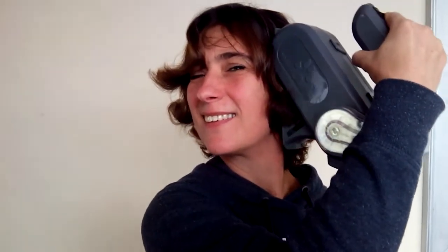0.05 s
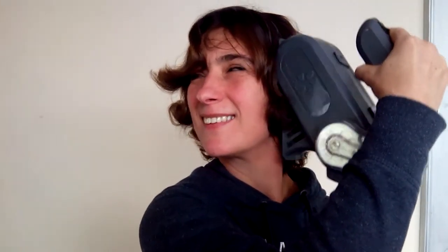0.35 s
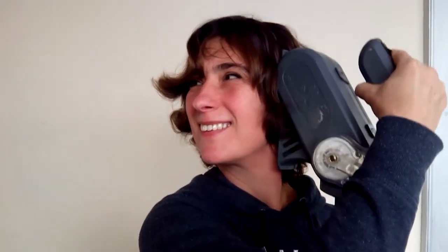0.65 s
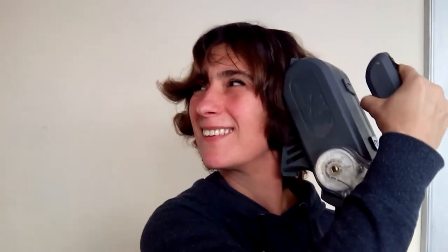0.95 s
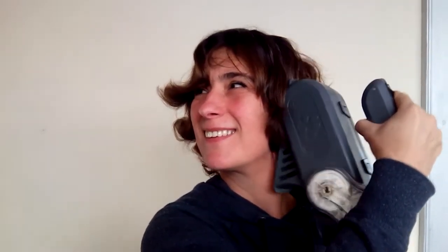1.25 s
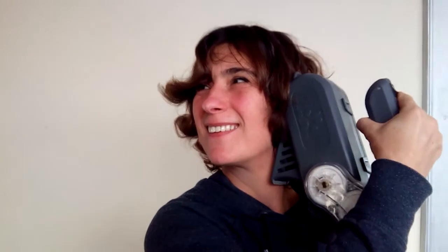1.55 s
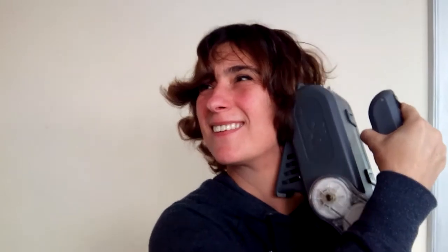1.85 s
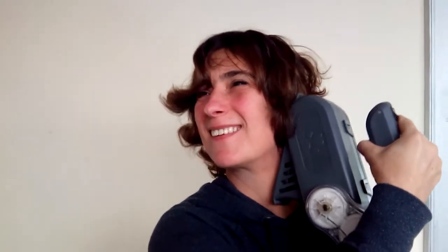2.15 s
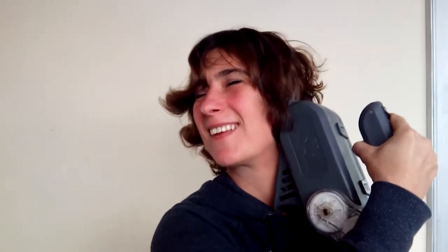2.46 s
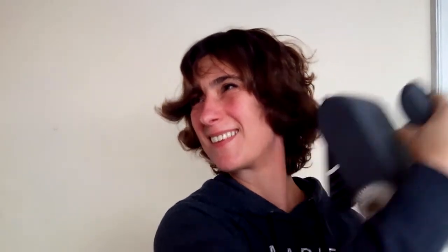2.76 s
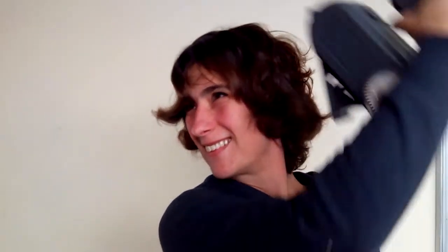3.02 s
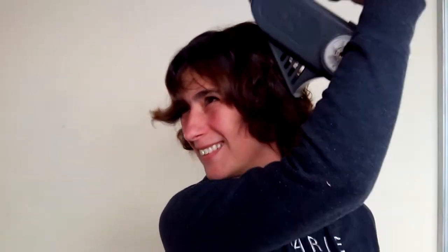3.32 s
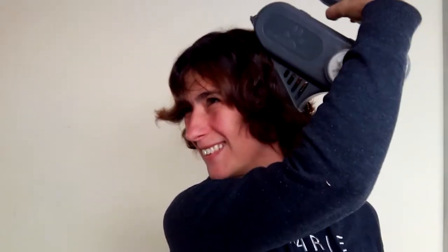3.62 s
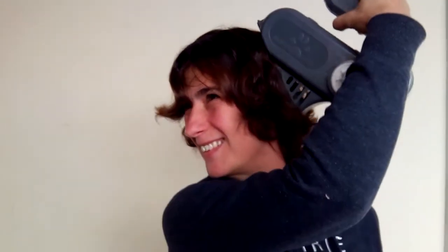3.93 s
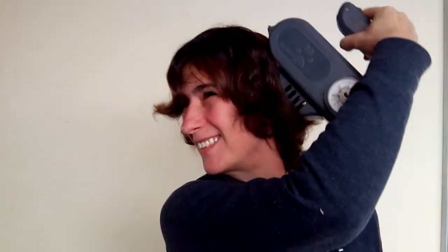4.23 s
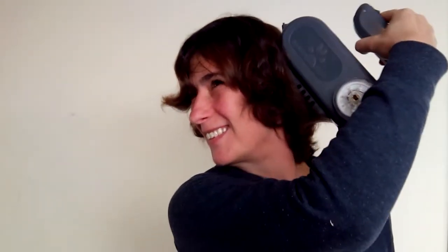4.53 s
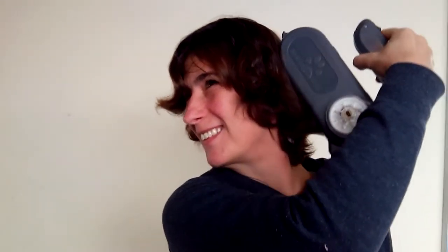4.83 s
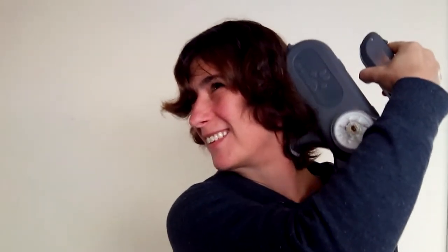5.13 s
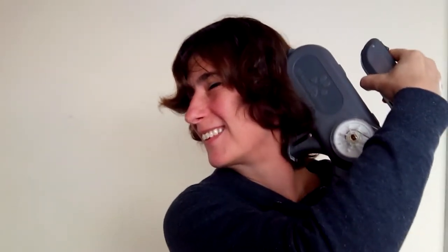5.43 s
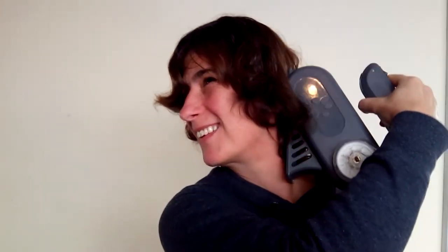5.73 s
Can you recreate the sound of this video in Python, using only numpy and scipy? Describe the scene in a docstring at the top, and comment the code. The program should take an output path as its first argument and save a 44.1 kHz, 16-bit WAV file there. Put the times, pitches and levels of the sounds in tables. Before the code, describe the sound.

Steady whine and rattling whir of an electric hair brush in a small room, with soft bumps and light crackling of hair.

```python
"""In a small room, a handheld motorised brush is pressed to hair, lifted, tipped over and pressed on again.
Its motor hums at about 90 turns a second. A 12-tooth gear (the pinion) whines and rattles against
a 30-tooth wheel in a plastic housing. The speed sags under load and sways with each turn of the roller.
Hair crackles in the comb, the roller rushes, the hand rumbles, and a few dull bumps pass through."""
import sys
import numpy as np
from scipy import signal
from scipy.fft import rfft, irfft, next_fast_len
from scipy.io import wavfile

SR = 44100
rng = np.random.default_rng(int(sys.argv[2]) if len(sys.argv) > 2 else 0)


def file_out(sig):
    """Save sig as 16-bit WAV at sys.argv[1]."""
    # one column per channel
    cols = np.atleast_2d(sig).T
    # limit, then scale
    lim = np.clip(cols, -1, 1)
    pcm = np.round(lim * 32767).astype(np.int16)
    wavfile.write(sys.argv[1], SR, pcm)


N = 259308
TIME = np.arange(N) / SR
PINION_TEETH, WHEEL_TEETH = 12, 30
TANGLE_S, TANGLE_HALF_S = 1.595, 0.036   # a tangle brakes the motor once

# Motor speed under the drag of the hair: time_s, turns_per_s
MOTOR_SPEED = [(0.0, 89.38), (0.16, 89.7), (0.32, 89.52), (0.52, 91.04), (0.68, 89.46), (0.8, 89.26),
               (0.88, 90.29), (1.08, 90.07), (1.28, 90.71), (1.4, 90.0), (1.56, 89.69), (1.88, 90.64),
               (2.16, 90.22), (2.36, 91.07), (2.48, 90.68), (2.64, 91.2), (2.88, 91.26), (3.12, 90.58),
               (3.2, 91.35), (3.72, 90.79), (3.88, 91.13), (4.08, 88.59), (4.28, 89.12), (4.32, 89.7),
               (4.4, 88.7), (4.52, 88.0), (4.64, 88.84), (4.84, 87.51), (4.88, 88.65), (5.0, 88.94),
               (5.08, 87.97), (5.12, 88.29), (5.2, 87.73), (5.28, 88.32), (5.36, 87.98), (5.44, 88.76),
               (5.48, 88.09), (5.6, 87.78), (5.8, 89.55), (5.88, 89.76)]
# How much the ears differ (side) against what they share (mid): pitch_hz, side_minus_mid_db
STEREO_WIDTH = [(60, -14.5), (200, -28), (500, -16), (1400, -13), (2500, -7.5), (3600, -6.5), (4500, -1.5),
                (5300, 0), (7500, 9.5)]
# Which ear hears more: pitch_hz, left_minus_right_db
STEREO_BALANCE = [(60, 0), (450, 1.5), (2200, 1.5), (4300, 1.2), (5000, -2), (7500, -3)]


def motor_speed(sway_turns_per_s=0.38, turns_per_roll=30, tangle_turns_per_s=1.0):
    """Turns per second: the roller drags unevenly as it goes round, and the tangle brakes it."""
    speed, = in_time(MOTOR_SPEED)
    roller_turns = np.cumsum(speed) / SR / turns_per_roll
    sway = sway_turns_per_s * np.cos(2 * np.pi * (roller_turns - 0.187))
    return speed + sway - tangle_turns_per_s * swell(TANGLE_S, TANGLE_HALF_S)


def hum_and_whine(turns, speed, wheel_angle, throb_depth):
    """The motor hums and the gear teeth whine; the whine throbs with each turn of the wheel."""
    # How the housing faces the room: time_s, tilt (0 upright, 1 tipped over)
    tilt_curve = [(0, 0.094), (3.1, 0.15), (3.85, 0.37), (4.15, 0.99), (5.88, 0.94)]
    # Two low hum tones, at 4 and 5 cycles per turn: time_s, lower_tone_db, upper_tone_db
    hum_levels = [(0.0, -34.5, -39.5), (0.47, -43.5, -42), (0.91, -38, -38.5), (0.95, -45, -41.5),
                  (1.65, -44, -39.5), (2.67, -48, -37), (2.72, -45.5, -45), (3.21, -53, -45),
                  (3.37, -52.5, -61), (3.52, -58, -44.5), (4.1, -48.5, -43.5), (4.26, -43, -41.5),
                  (4.47, -53, -46), (4.68, -38.5, -41.5), (4.77, -46.5, -48), (5.01, -41.5, -36),
                  (5.14, -50, -48), (5.27, -38.5, -45), (5.75, -37.5, -42.5), (5.88, -50, -41)]
    # Main tones of motor and gears: cycles_per_turn
    main_cycles = (1, 8, 24, 34, 36, 42, 46, 48, 50, 54, 58)
    # One row per main tone: upright_db, tipped_db, db_per_extra_turn_per_s,
    # throb_share, throb_lead_rad, bend_rad, bend_lead_rad
    main_tones = [(-60, -66, 0, 0, 0, 0, 0), (-50.7, -54.5, 1, 0, 0, 0, 0),
                  (-43.5, -59, 2, 1.5, 2.8, .5, 1.7), (-46.3, -52.5, 2.5, 2.4, -.3, .7, -1.6),
                  (-39.8, -42.5, -1, 1.5, 0, .5, -.9), (-44.3, -45.5, -1, 1.1, .5, 1.3, -1.8),
                  (-45.5, -41.5, 2.5, 2.1, -.2, .8, -2.8), (-39.2, -46, -1.6, 1.9, -.1, 1.1, 0),
                  (-40.7, -44.8, -1, 1.4, 0, .6, 1.9), (-40, -42, -2.2, .9, .6, 1, -2.1),
                  (-44.3, -45.5, 0, 1.3, -.3, 1.5, 3)]
    # Lesser tones of motor and gears: cycles_per_turn, upright_db, tipped_db
    lesser_tones = [(3.8, -58.0, -59.0), (5.2, -51.0, -52.0), (5.4, -58.5, -57.5), (6.0, -56.5, -57.5),
                    (7.0, -57.0, -56.5), (10.0, -57.0, -61.0), (11.0, -61.5, -60.5), (11.6, -65.0, -53.5),
                    (12.0, -52.5, -50.5), (12.4, -61.5, -56.0), (13.0, -59.0, -62.5), (14.0, -58.0, -51.0),
                    (14.4, -70.0, -60.0), (15.0, -50.0, -58.5), (16.0, -59.5, -58.5), (18.0, -65.5, -64.5),
                    (18.4, -64.5, -66.5), (20.0, -60.5, -59.5), (22.0, -55.0, -56.5), (24.8, -57.5, -60.5),
                    (25.0, -55.0, -56.0), (26.0, -57.5, -60.5), (26.4, -56.0, -60.5), (28.0, -51.0, -52.5),
                    (28.8, -59.0, -62.5), (30.0, -56.5, -61.0), (31.6, -59.5, -64.0), (32.0, -57.0, -59.0),
                    (32.8, -62.0, -59.0), (37.0, -58.5, -55.5), (37.6, -58.5, -57.5), (38.0, -49.5, -49.5),
                    (39.2, -52.0, -61.0), (39.6, -53.0, -62.5), (40.0, -51.0, -58.0), (40.8, -56.5, -59.5),
                    (42.8, -56.5, -60.5), (44.0, -57.0, -57.5), (44.4, -57.0, -58.0), (51.0, -51.0, -54.5),
                    (51.6, -50.0, -54.5), (52.4, -56.0, -54.0), (52.8, -55.5, -53.0), (54.8, -49.0, -52.5),
                    (55.2, -50.0, -50.5), (56.4, -58.0, -57.0), (59.6, -59.5, -53.0), (60.0, -60.0, -55.0),
                    (60.4, -59.0, -53.0), (62.0, -60.5, -59.5), (64.0, -62.5, -62.0), (66.0, -56.0, -57.0)]
    # One tone rings out or fades for a moment: time_s, cycles_per_turn, change_db, half_length_s
    tone_swells = [(.05, 48, -4, .08), (.2, 36, -2.5, .1), (.26, 54, -5, .04), (.48, 36, 1.5, .07),
                   (1.07, 36, -3, .07), (1.35, 58, 4, .06), (.35, 50, -2.5, .35), (.25, 48, -2, .06),
                   (1.72, 46, 5, .06), (3.98, 46, 4, .06), (.53, 8, 5, .07), (.5, 54, -3, .06),
                   (.8, 54, 6.5, .11), (1.2, 54, 3, .08), (1.25, 48, 3, .2), (1.35, 8, 5, .09),
                   (1.4, 24, 2, .5), (1.4, 50, 3, .06), (1.8, 54, 3.5, .1), (2, 8, 6, .07),
                   (2.25, 50, 3, .25), (2.35, 36, 2.5, .15), (2.35, 8, 4, .05), (2.39, 5, -8, .025),
                   (2.6, 5, 2, .07), (2.6, 34, 3.5, .4), (2.85, 42, 5, .05), (2.9, 8, 8, .05),
                   (3.03, 36, -6, .06), (3.08, 50, -4, .04), (3.08, 15, 4, .07), (3.21, 8, 7, .045),
                   (3.21, 36, 6, .04), (3.41, 36, -4, .06), (3.25, 50, 6, .045), (3.2, 26.4, 4, .2),
                   (3.2, 24, 3, .25), (3.35, 46, 5.5, .15), (1.88, 36, 2, .12), (3.41, 48, 3, .07),
                   (3.45, 6, 9, .27), (3.45, 28, 3, .3), (3.4, 20, 3, .3), (3.98, 12, 7, .04),
                   (5.82, 48, 4, .04), (3.48, 50, 3, .08), (3.65, 54, 5, .06), (3.67, 36, 4, .08),
                   (3.85, 42, 4, .12), (3.98, 36, 5, .04), (4.05, 54, 7, .04), (4.13, 36, -7, .04),
                   (4.21, 54, 8, .05), (4.36, 54, 4, .04), (4.5, 54, 6, .07), (4.85, 36, 5, .05),
                   (5.2, 36, 3.5, .05), (5.43, 8, 9, .04), (5.52, 36, -4, .08), (5.62, 54, -3, .1),
                   (5.65, 46, 3, .2), (5.78, 36, 5, .08), (5.84, 8, 7, .04)]

    whine_from = 2 * PINION_TEETH   # cycles per turn; anything lower is hum
    tilt, = np.float32(in_time(tilt_curve))
    extra_speed = speed - blend(91.03, 88.66, tilt)   # above the usual turns per second
    main_waver = blend(0.13, 0.2, tilt)
    flutter_db = gear_flutter(turns)
    wheel_angle = np.float32(wheel_angle % (2 * np.pi))

    tones = []   # cycles_per_turn, level_db, waver, throb, turns
    for cycles, level_db in zip((4, 5), in_time(hum_levels)):
        tones.append((cycles, level_db - 1 + flutter_db, 0.29, 1, turns))
    for cycles, row in zip(main_cycles, main_tones):
        upright_db, tipped_db, db_per_speed, throb_share, throb_lead, bend, bend_lead = row
        level_db = blend(upright_db, tipped_db, tilt) + db_per_speed * extra_speed - 0.31
        throb = 1 + throb_share * throb_depth * np.cos(wheel_angle + throb_lead)
        # the wheel also pushes the wave early and late, bending its pitch
        bend_turns = bend * throb_depth * np.sin(wheel_angle + bend_lead) / (2 * np.pi * cycles)
        tones.append((cycles, level_db, main_waver, throb, turns + bend_turns))
    lesser_throb = np.float32(1 + 0.15 * throb_depth * np.cos(wheel_angle))
    for cycles, upright_db, tipped_db in lesser_tones:
        level_db = blend(upright_db, tipped_db, tilt) - (0 if cycles < whine_from else 1.5)
        tones.append((cycles, level_db, 0.55, lesser_throb, turns))

    hum, whine = np.zeros((2, 2, N), np.float32)
    for cycles, level_db, waver, throb, tone_turns in tones:
        ring_db = sum(db * swell(s, half_s) for s, which, db, half_s in tone_swells if which == cycles)
        waver = waver * from_db(-np.maximum(ring_db, 0))   # a tone that rings out holds steadier
        tone = shaft_tone(tone_turns, cycles, level_db + ring_db, waver)
        if cycles < whine_from:
            hum += tone
        else:
            whine += throb * tone
    tangle_dip = from_db(-3 * swell(TANGLE_S, TANGLE_HALF_S))
    return tangle_dip * hum, tangle_dip * whine


def shaft_tone(turns, cycles_per_turn, level_db, waver):
    """One tone in step with the motor shaft; it wavers as its echoes shift with the moving brush."""
    pitch_hz = cycles_per_turn * np.mean(np.array(MOTOR_SPEED)[:, 1])
    cycles = cycles_per_turn * turns + rng.random()
    angle = np.float32(2 * np.pi * (cycles % 1))
    mid = (1 + waver * drift(5.9)) * np.cos(angle) + waver * drift(6) * np.sin(angle)
    mid /= np.sqrt(1 + 2 * waver ** 2)   # wavering adds no power
    width = float(from_db(at_hz(STEREO_WIDTH, pitch_hz)))
    balance = float(from_db(at_hz(STEREO_BALANCE, pitch_hz) / 2))
    side = width * int(rng.choice([-1, 1])) * np.sin(angle + 0.56 * drift(0.79))
    gain = np.float32(np.sqrt(2 / (1 + width ** 2)) * from_db(level_db))
    return gain * np.array([(mid + side) * balance, (mid - side) / balance])


def gear_flutter(turns):
    """The gears bind about once in five turns, so the low hum flutters; gives the change in dB."""
    # Strength of the flutter: time_s, depth (0 to 1)
    flutter_depths = [(0, .15), (.65, .25), (.9, .12), (1.3, .3), (1.8, .3), (2.07, .55), (2.17, .12),
                      (2.55, .2), (4.5, .25), (5.88, .18)]
    depth, = in_time(flutter_depths)
    return 20 * np.log10(1 + depth * np.cos(2 * np.pi * turns / 5 + drift(12)))


def gear_rattle(turns, throb):
    """Each pair of worn teeth meets with its own knock, in a pattern that repeats every five turns."""
    # Loudness of the gear rattle over time, nearly steady: time_s, level_db
    rattle_levels = [(0, -30.5), (.5, -31), (.9, -29.5), (1.3, -30), (2, -30), (2.55, -28), (2.9, -29),
                     (3.35, -30), (3.8, -29), (4.2, -31), (5.88, -30)]
    # Tone colour of the knocks: pitch_hz, level_db
    rattle_colour = [(900, -26.5), (1600, -12.5), (2100, -7), (2700, -5), (3200, 0.5), (3950, -3.5),
                     (4450, 4.5), (5000, -6.5), (5500, -19), (6100, -25.5), (6700, -26), (7500, -26),
                     (8200, -54)]
    # Where the plastic housing rings: pitch_hz, width_hz, boost_db
    housing_rings = [(2360, 34, 5.5), (2400, 67, -11), (3520, 360, -1), (3680, 47, 7), (4360, 33, -0.5),
                     (4750, 380, -0.5), (4780, 330, 6.5), (5180, 80, 14.5), (6370, 30, 19)]
    teeth_passed = turns * PINION_TEETH
    tooth = np.arange(1, int(teeth_passed[-1]))
    force = 0.4 * tooth_wear(PINION_TEETH)[tooth % PINION_TEETH]
    force += 0.55 * tooth_wear(WHEEL_TEETH)[tooth % WHEEL_TEETH]
    force += rng.standard_normal(N)[tooth]   # loose teeth add chance knocks
    # each knock is shared between the two samples around its moment
    position = np.interp(tooth, teeth_passed, np.arange(N))
    sample, part = position.astype(int), position % 1
    knocks = np.bincount(sample, force * (1 - part), N) + np.bincount(sample + 1, force * part, N)
    knocks *= throb
    rattle = to_ears(echoes(knocks), echoes(knocks), rattle_colour, housing_rings)
    rattle_db, = in_time(rattle_levels)
    return from_db(rattle_db - 7.5) * rattle


def tooth_wear(teeth):
    """Random unevenness around a gear, one value for each tooth."""
    ripples = np.exp(2j * np.pi * rng.random(teeth // 2))
    return unit_power(irfft(np.r_[0, ripples], teeth))


def dull_bumps():
    """Soft contacts make low tones that swell and quickly die away."""
    # One row per bump: start_s, peak_db, pitch_hz, rise_s
    bumps = [(0.869, -43, 95.4, 0.027), (1.66, -33, 66, 0.027), (1.774, -21.5, 70, 0.026),
             (1.764, -31.5, 208, 0.006), (1.785, -17, 99.5, 0.0072), (1.793, -20, 139, 0.0089),
             (1.885, -30.5, 90, 0.016), (2.385, -36.5, 83.5, 0.016), (2.488, -35, 148, 0.032)]
    sound = np.zeros(N)
    for start_s, peak_db, pitch_hz, rise_s in bumps:
        age = np.maximum(TIME - start_s, 0)
        shape = (age / rise_s * np.exp(1 - age / rise_s)) ** 2
        sound += from_db(peak_db) * shape * np.sin(2 * np.pi * pitch_hz * age)
    return sound


def hair_crackle(clicks_per_s=4000):
    """Strands snap past the comb in short flurries of tiny clicks."""
    # Hair catching in the comb: time_s, level_db, half_length_s
    snags = [(0.262, -43, 0.0074), (0.313, -42.5, 0.012), (0.643, -50, 0.037), (1.426, -47, 0.037),
             (1.73, -54, 0.04), (2.51, -40.5, 0.04), (2.573, -44.5, 0.0079), (3.248, -47, 0.0099),
             (3.712, -46, 0.06), (4.808, -44, 0.029)]
    # Tone colour of the clicks: pitch_hz, level_db
    crackle_colour = [(1200, -6), (3000, -26), (5500, 3.5), (6600, -8), (7400, -18), (8500, -34)]
    flurries = sum(from_db(db) * swell(s, half_s) for s, db, half_s in snags)
    clicks = (rng.random(N) < clicks_per_s / SR) * rng.standard_normal((2, N))
    return flurries * to_ears(*clicks, crackle_colour)


def roller_rush(rest_db=-43, rub_db=4):
    """A steady rush from the roller, louder for a moment where it rubs over the hair."""
    # Tone colour of the rush: pitch_hz, level_db
    rush_colour = [(120, -42.5), (220, 3), (300, -4.5), (440, 1.5), (600, -2), (850, -1), (1150, -1),
                   (1600, -11), (2500, -2), (4500, -8), (6000, -6), (8000, -44)]
    level_db = rest_db + rub_db * swell(time_s=2.7, half_s=0.015)
    return from_db(level_db) * to_ears(*rng.standard_normal((2, N)), rush_colour)


def hand_rumble(rest_db=-55):
    """A low rumble from the hand, rising whenever the grip shifts."""
    # Shifts of the grip: time_s, rise_db, half_length_s
    grip_shifts = [(.82, 8.5, 0.15), (1.778, 16.5, 0.11), (2.494, 12.5, 0.094), (5.502, 6, 0.63)]
    # Tone colour of the rumble: pitch_hz, level_db
    rumble_colour = [(20, -59.5), (33, -29.5), (45, -7), (62, 5), (88, -6), (125, 2), (160, -3.5), (230, 2),
                     (320, -6.5), (600, -61)]
    level_db = rest_db + sum(db * swell(s, half_s) for s, db, half_s in grip_shifts)
    return from_db(level_db) * to_ears(*rng.standard_normal((2, N)), rumble_colour)


def echoes(sound, scatter_s=0.0033, room_fade_s=0.92, room_db=-6):
    """Sound bounces briefly inside the housing, then dies away in the room."""
    t = TIME[:SR // 2]
    lead = SR // 200
    scatter = rng.standard_normal(len(t)) * np.exp(-t / scatter_s)
    tail = rng.standard_normal(len(t)) * from_db(-60 * t / room_fade_s)
    # make every pitch equally strong, so the scatter adds no colour
    scatter = irfft(np.exp(1j * np.angle(rfft(scatter))), len(t))
    response = unit_power(np.roll(scatter, lead)) + from_db(room_db) * unit_power(tail)
    return signal.fftconvolve(sound, response)[lead:lead + N]


def to_ears(mid, side, colour, rings=()):
    """Colour a sound and spread it over both ears; their average has a power of one."""
    size = next_fast_len(N + SR // 4)
    hz = np.arange(size // 2 + 1) * SR / size
    ring_db = sum(db / (1 + (2 * (hz - pitch) / width) ** 2) for pitch, width, db in rings)
    gain = from_db(at_hz(colour, hz) + ring_db)
    mid = gain * rfft(unit_power(mid), size)
    side = gain * rfft(unit_power(side), size) * from_db(at_hz(STEREO_WIDTH, hz))
    balance = from_db(at_hz(STEREO_BALANCE, hz) / 2)
    ears = irfft([(mid + side) * balance, (mid - side) / balance], size)[:, :N]
    return ears / np.sqrt(np.mean(ears.mean(axis=0) ** 2))


def drift(rate_hz):
    """A smooth random wander of about 1 either way; a higher rate wanders faster."""
    step, warm_up = 100, 800   # samples per point, points dropped at the start
    memory = np.exp(-2 * np.pi * step * rate_hz / SR)
    noise = rng.standard_normal(N // step + warm_up + 2)
    slow = unit_power(signal.lfilter([1], [1, -2 * memory, memory ** 2], noise)[warm_up:])
    return np.float32(np.interp(np.arange(N) / step, np.arange(len(slow)), slow))


def swell(time_s, half_s):
    """A bell-shaped rise and fall around a moment."""
    return np.exp(-np.minimum(0.5 * np.float32((TIME - time_s) / half_s) ** 2, 20))


def blend(upright, tipped, tilt):
    """A value between its upright and its tipped-over setting."""
    return np.float32(upright) + tilt * np.float32(tipped - upright)


def in_time(rows):
    """Read each column of a time table at every sample."""
    times, *columns = np.transpose(rows)
    return [np.interp(TIME, times, column) for column in columns]


def at_hz(rows, hz):
    """Read a pitch table between its rows, with octaves evenly spaced."""
    pitches, values = np.transpose(rows)
    return np.interp(np.log(hz + 1e-3), np.log(pitches), values)


def from_db(db):
    """Turn decibels into a gain."""
    return np.exp(np.float32(db) * np.float32(np.log(10) / 20))


def unit_power(sound):
    """Scale to an average power of one."""
    return sound / np.sqrt(np.mean(sound ** 2) + 1e-20)


def scene():
    """The turning motor drives hum, whine and rattle; roller, hand and hair sound around them."""
    # How hard the wheel throbs: time_s, depth (0 to 1)
    throb_depths = [(0, .14), (.28, .14), (.5, .32), (.8, .18), (1.1, .36), (2.5, .3), (2.85, .2),
                    (3.1, .15), (3.4, .3), (3.9, .22), (4.2, .14), (4.5, .3), (5.25, .27), (5.5, .43),
                    (5.88, .38)]
    # Which way the gearbox throws its sound: time_s, left_minus_right_db
    gearbox_aim = [(0, -0.5), (.45, 0), (.85, -0.5), (1.5, -1), (2.7, 0.5), (3.3, -2), (4.15, -0.5),
                   (4.6, -0.5), (5.55, 2.5), (5.88, 0)]
    throb_depth, = in_time(throb_depths)
    aim_db, = in_time(gearbox_aim)
    speed = motor_speed()
    turns = np.cumsum(speed) / SR + 0.0011 * drift(21)
    # the wheel runs slightly off centre and presses harder on the pinion once a turn
    wheel_angle = 2 * np.pi * turns * PINION_TEETH / WHEEL_TEETH - np.pi / 2
    hum, whine = hum_and_whine(turns, speed, wheel_angle, throb_depth)
    rattle = gear_rattle(turns, throb=1 + 0.35 * throb_depth * np.cos(wheel_angle))
    unsteady_db = 0.89 * drift(14)   # dragging hair makes the gears run unsteadily
    gearbox = (whine + rattle) * from_db(unsteady_db + np.array([aim_db, -aim_db]) / 2)
    return hum + gearbox + roller_rush() + hand_rumble() + dull_bumps() + hair_crackle()


def record(dry):
    """Cut the treble steeply above about 8100 Hz."""
    return signal.sosfiltfilt(signal.butter(16, 8100, fs=SR, output="sos"), dry)


dry = scene()
out = record(dry)
file_out(out)
```